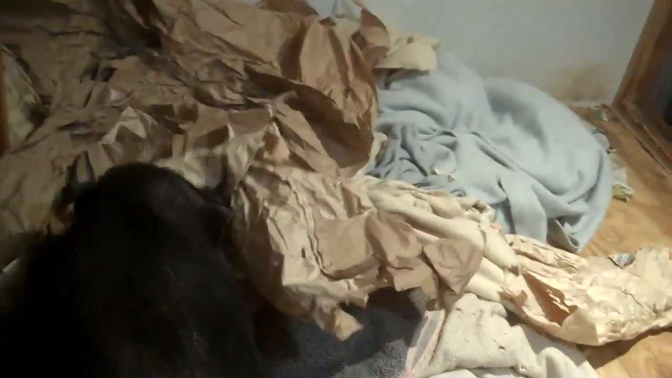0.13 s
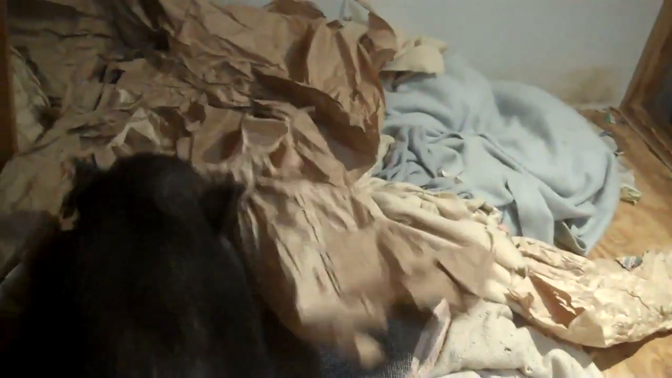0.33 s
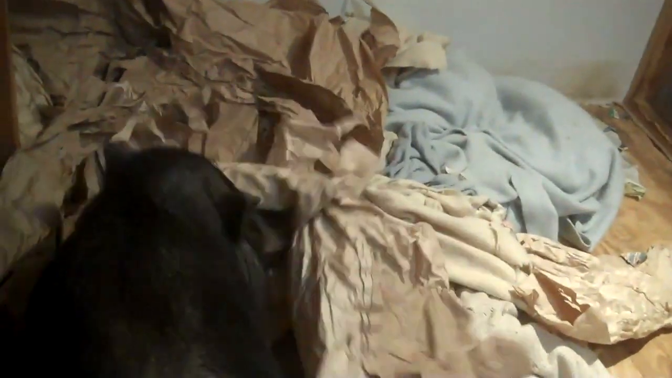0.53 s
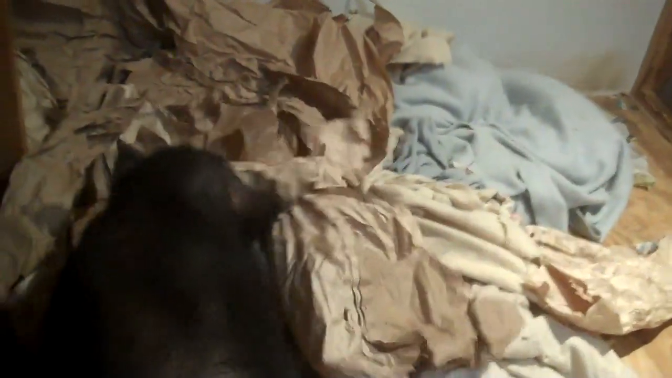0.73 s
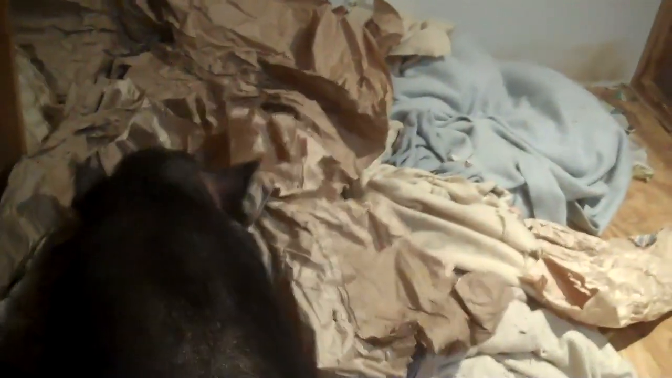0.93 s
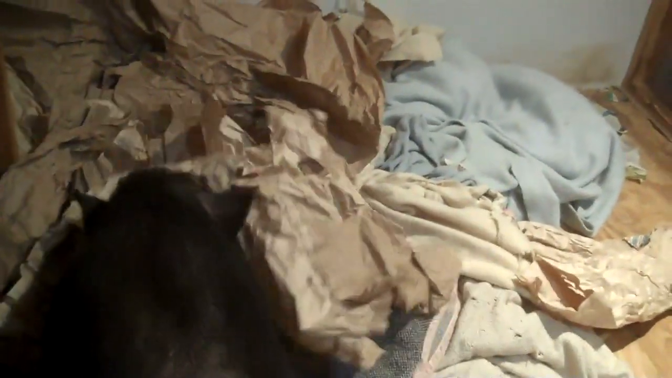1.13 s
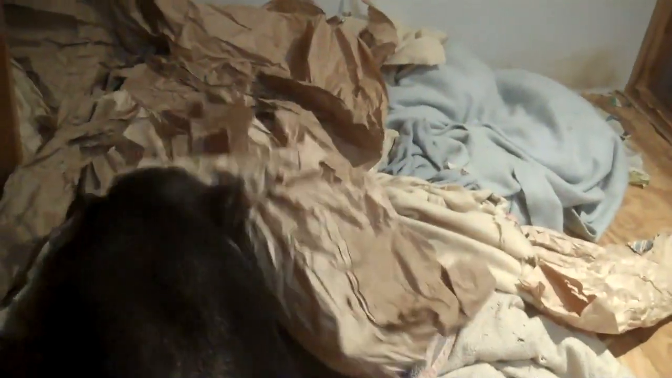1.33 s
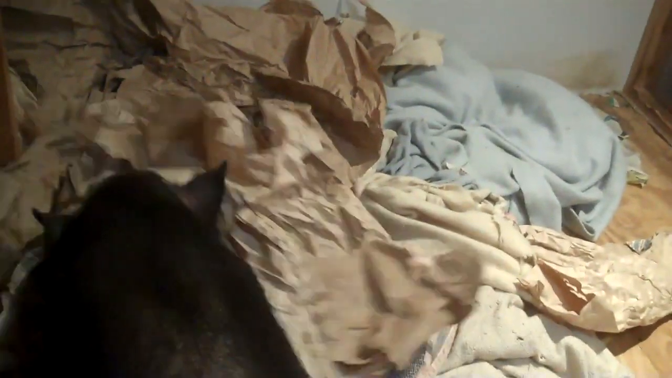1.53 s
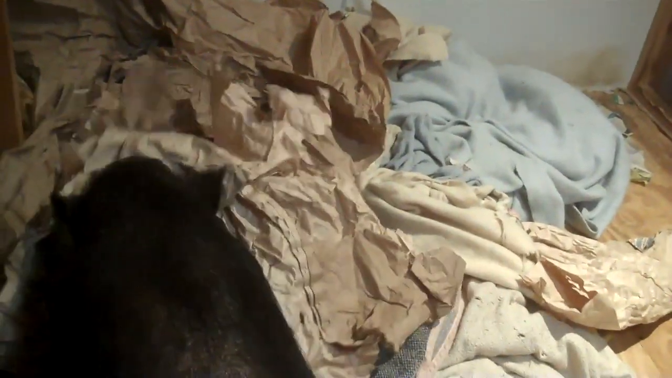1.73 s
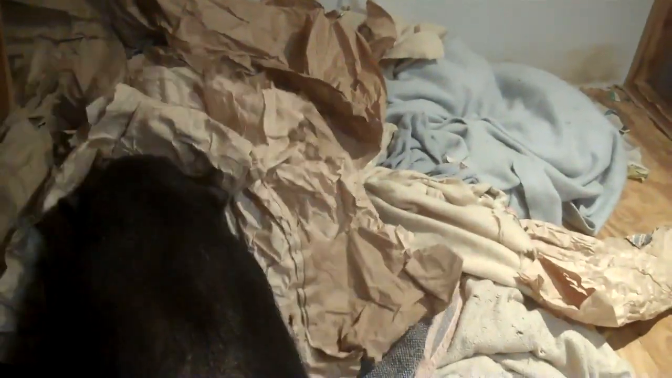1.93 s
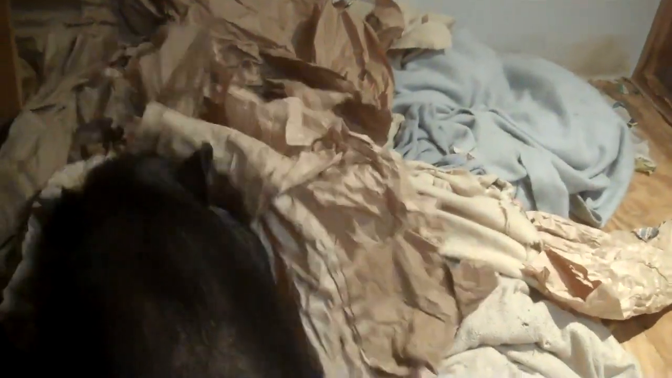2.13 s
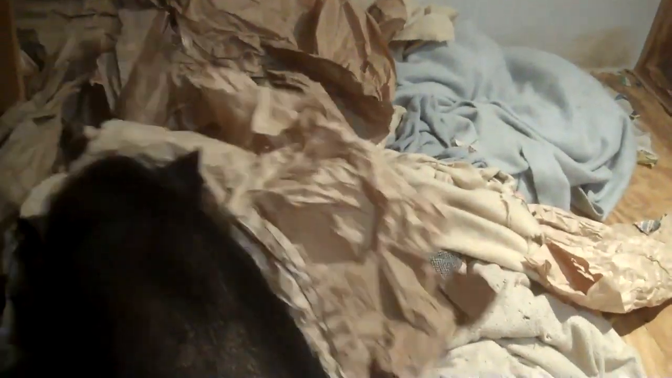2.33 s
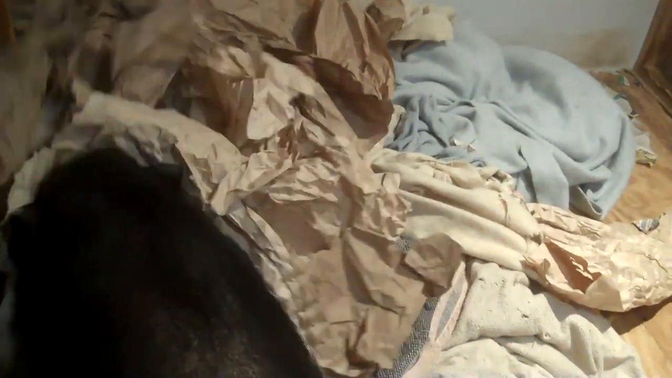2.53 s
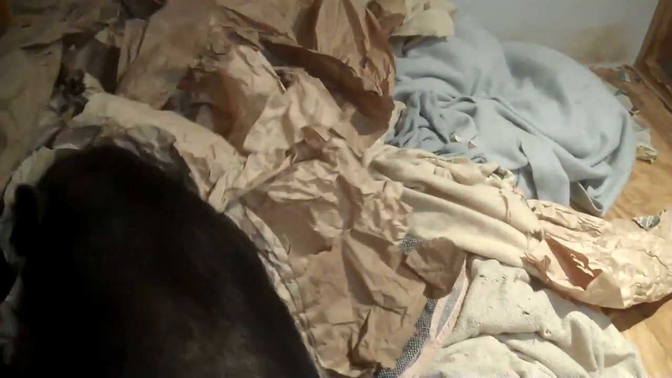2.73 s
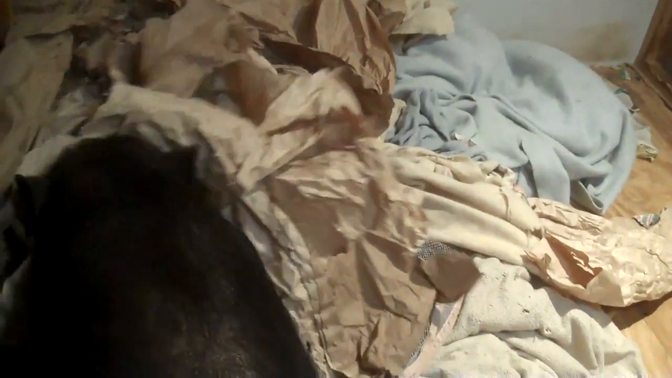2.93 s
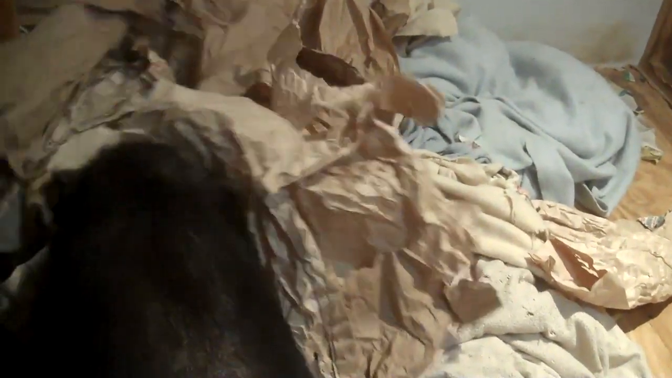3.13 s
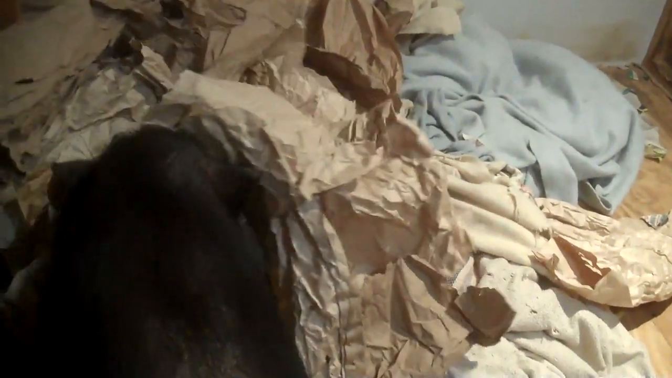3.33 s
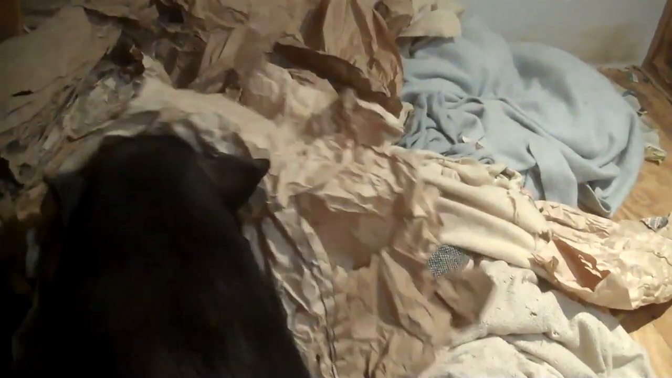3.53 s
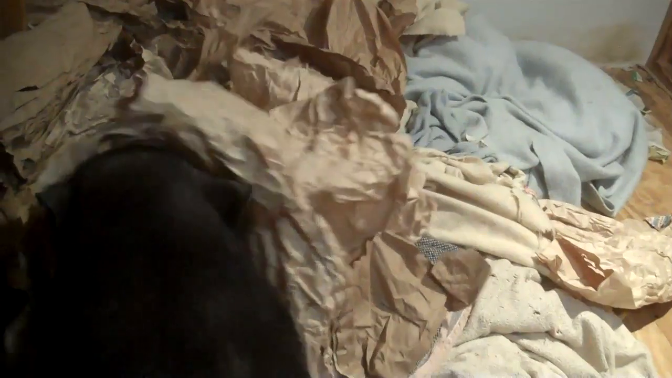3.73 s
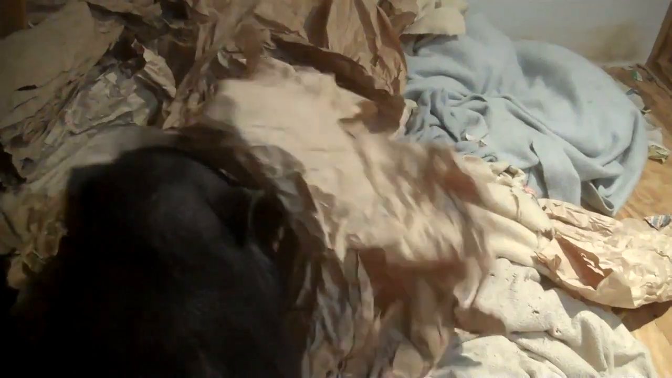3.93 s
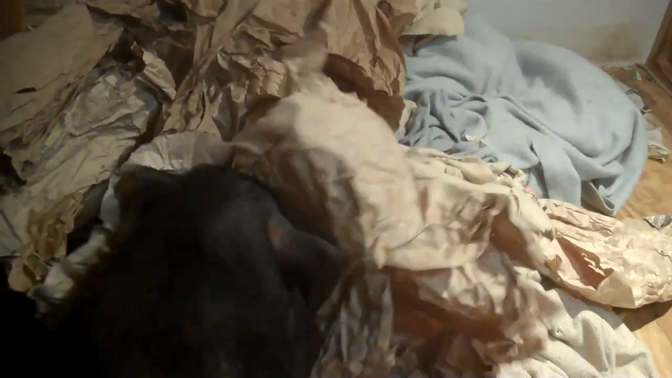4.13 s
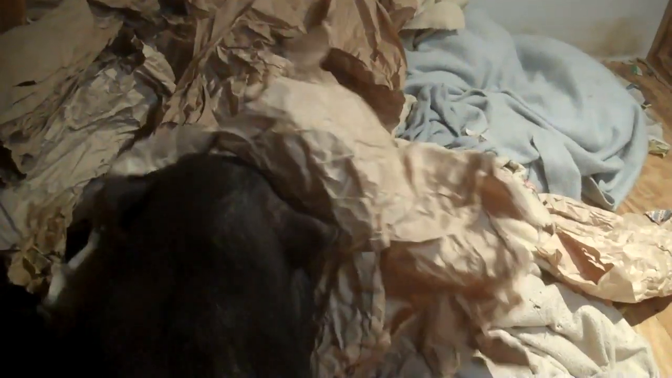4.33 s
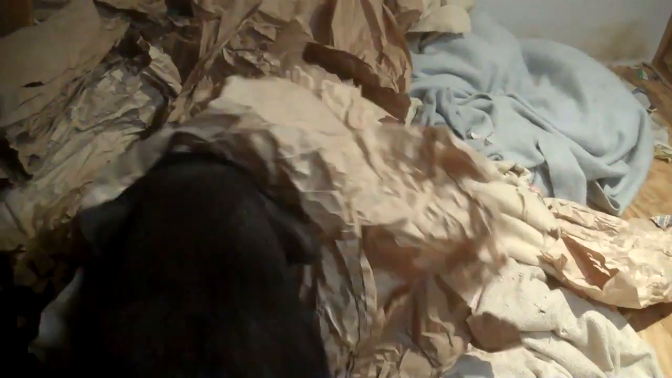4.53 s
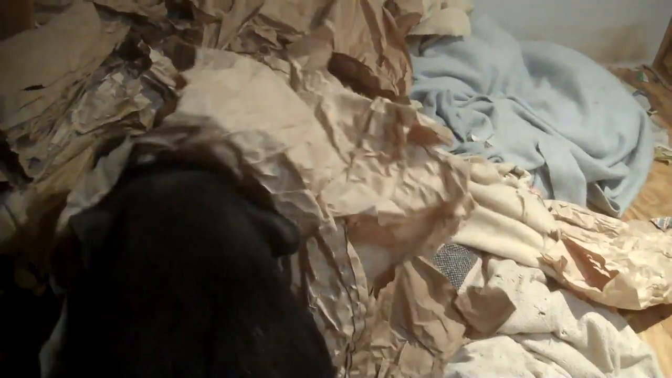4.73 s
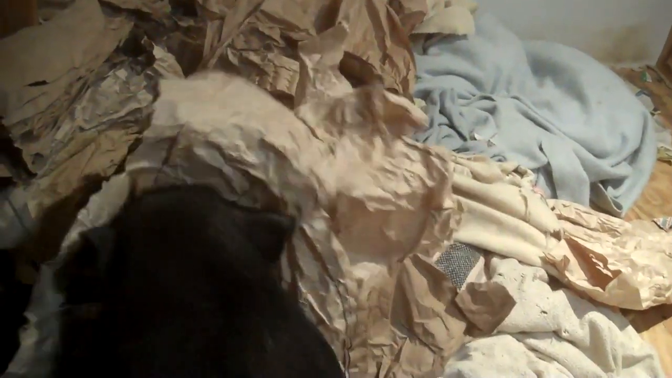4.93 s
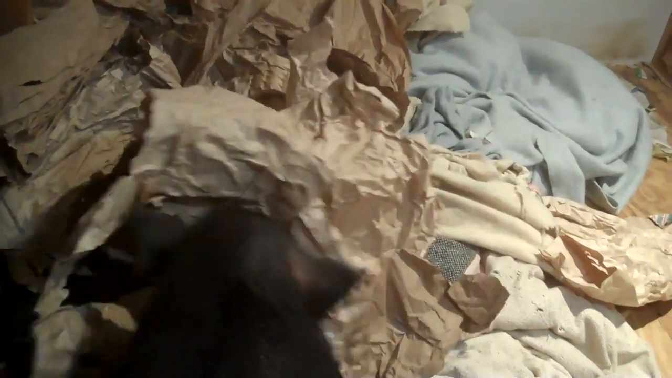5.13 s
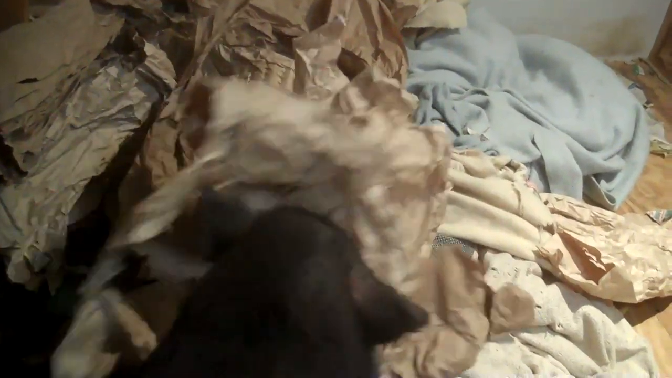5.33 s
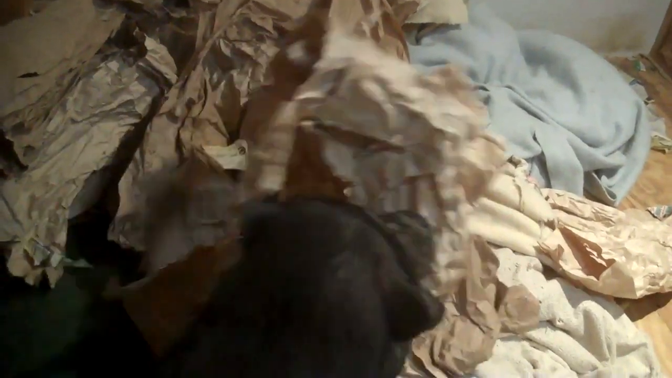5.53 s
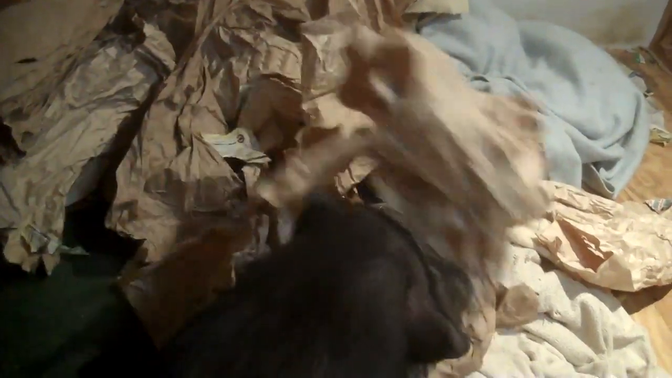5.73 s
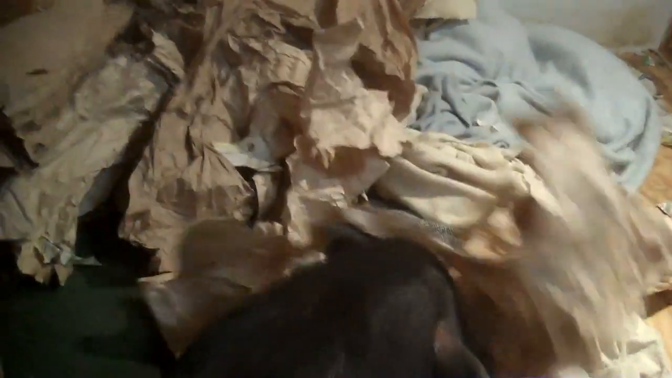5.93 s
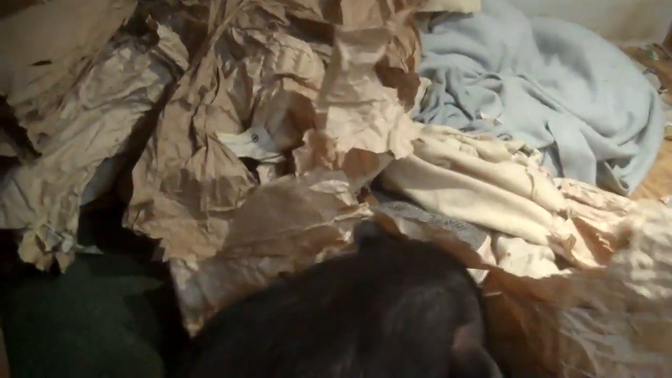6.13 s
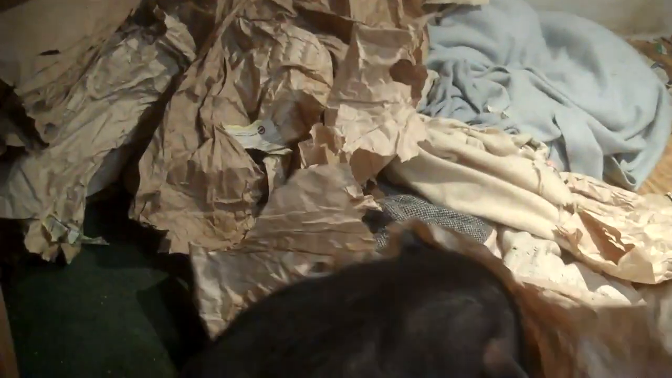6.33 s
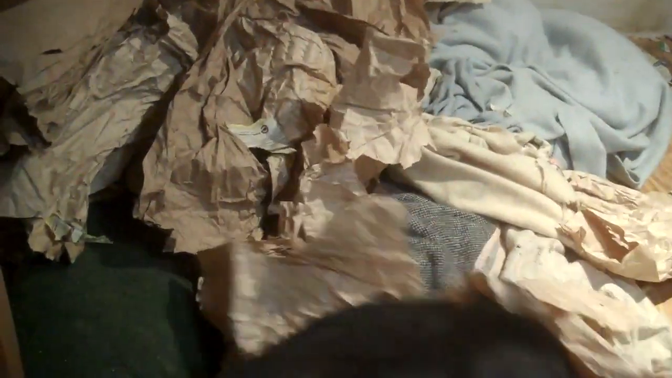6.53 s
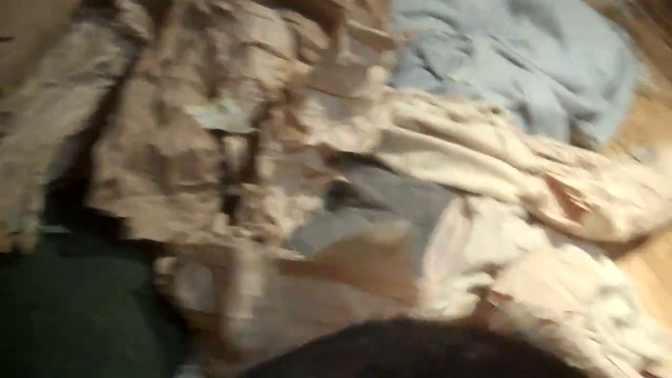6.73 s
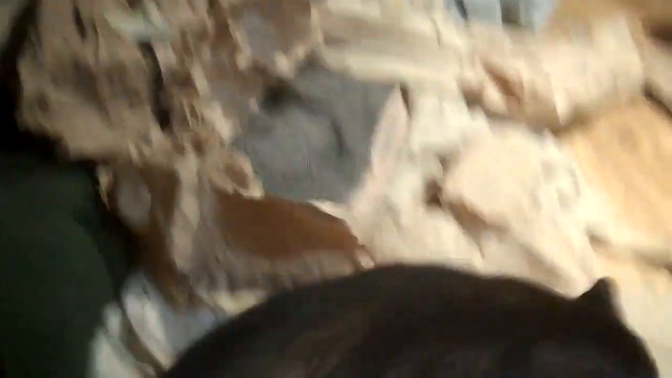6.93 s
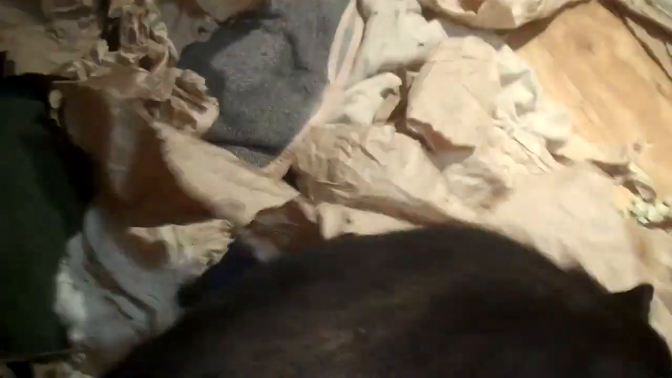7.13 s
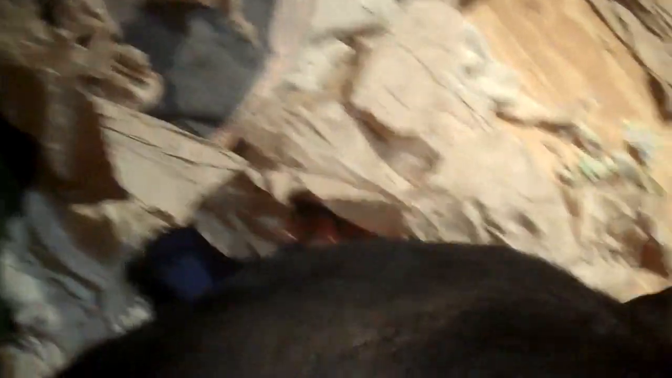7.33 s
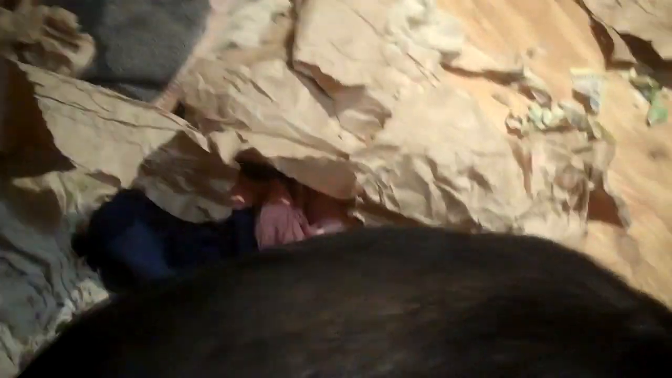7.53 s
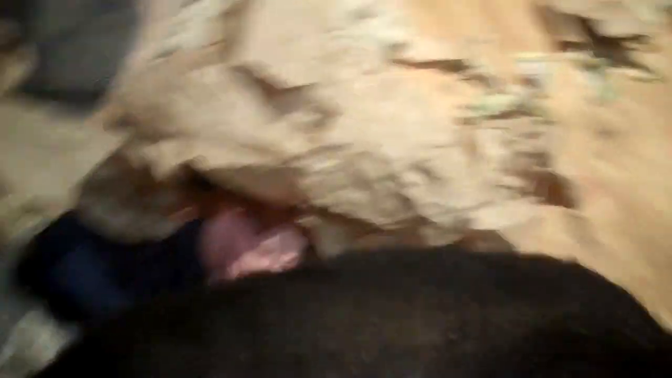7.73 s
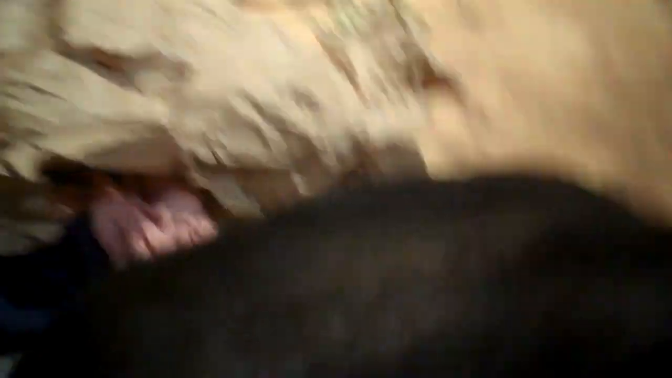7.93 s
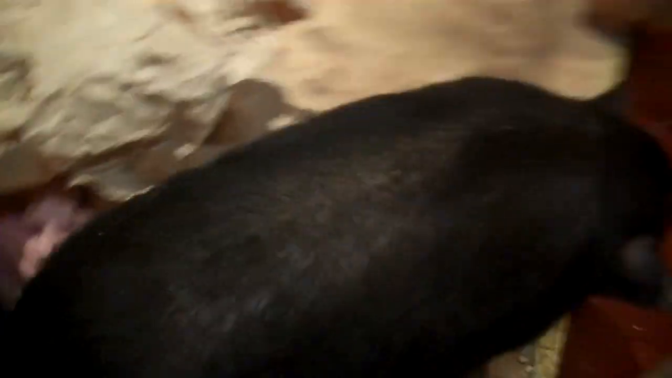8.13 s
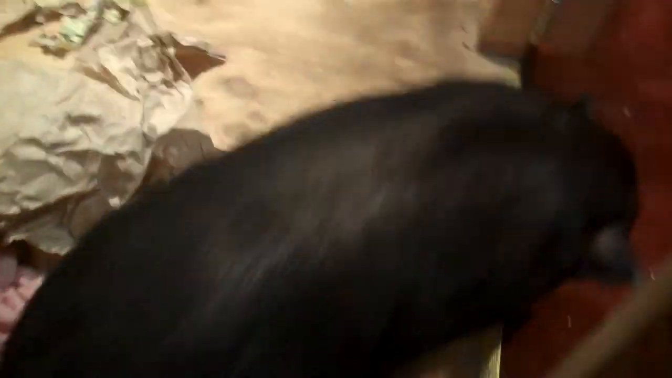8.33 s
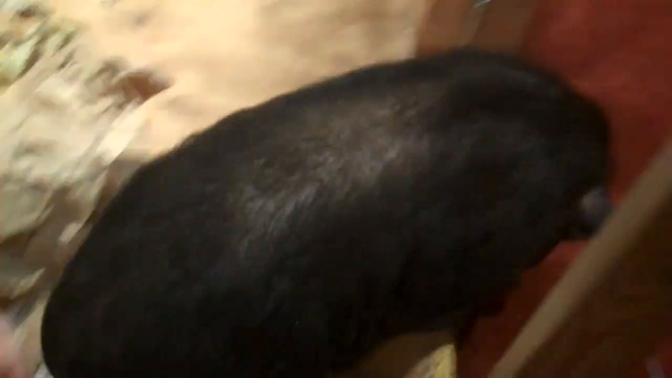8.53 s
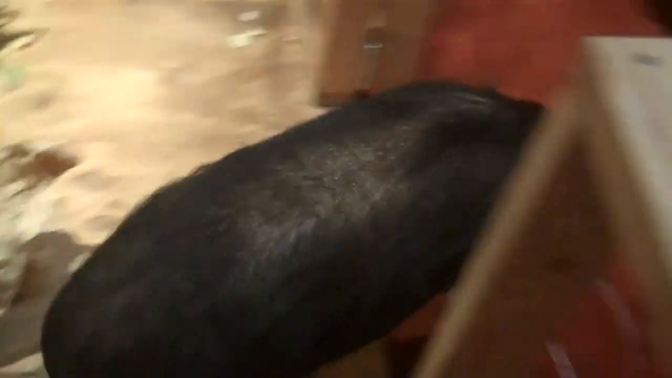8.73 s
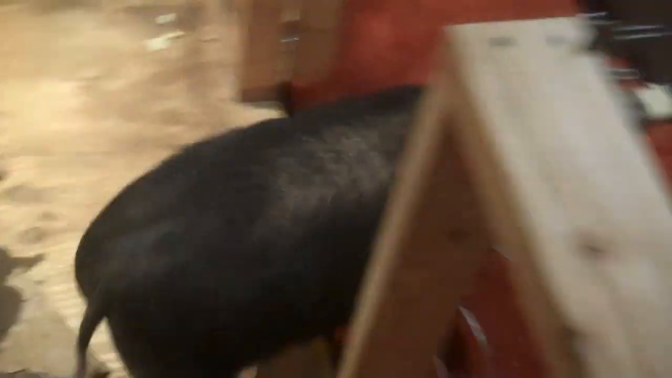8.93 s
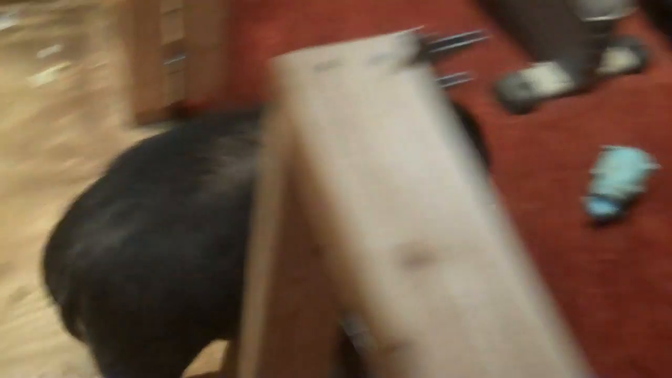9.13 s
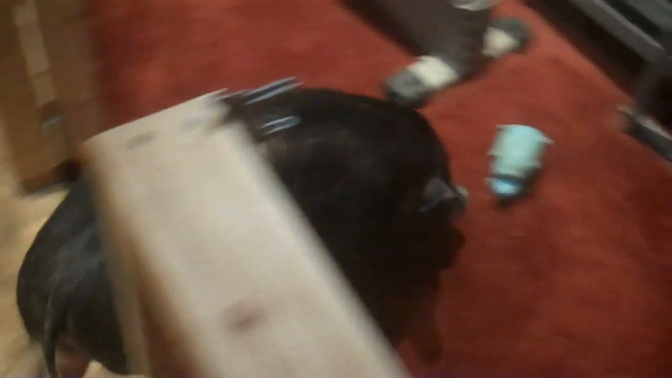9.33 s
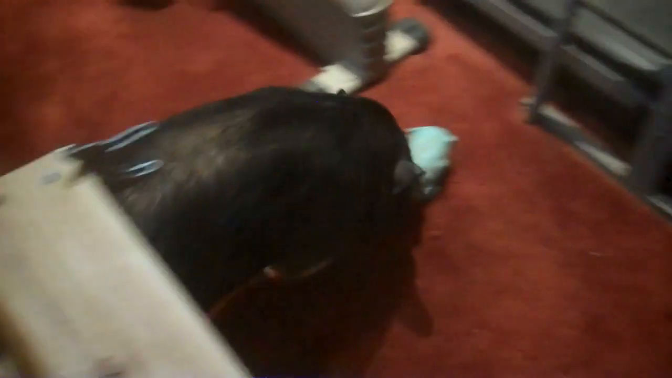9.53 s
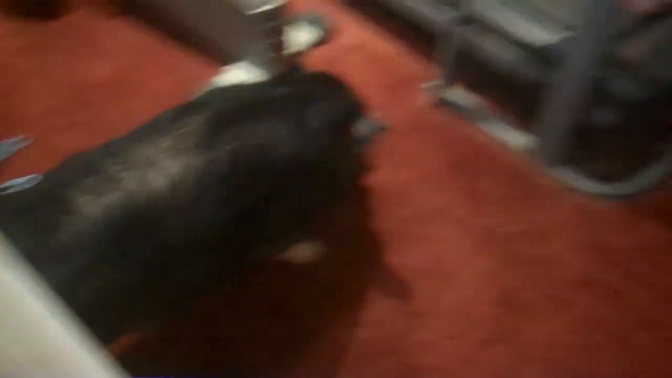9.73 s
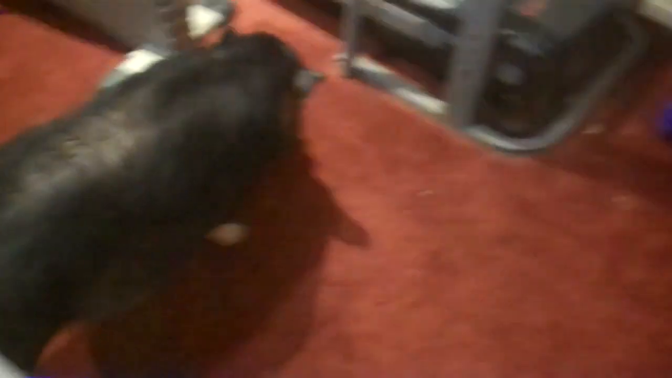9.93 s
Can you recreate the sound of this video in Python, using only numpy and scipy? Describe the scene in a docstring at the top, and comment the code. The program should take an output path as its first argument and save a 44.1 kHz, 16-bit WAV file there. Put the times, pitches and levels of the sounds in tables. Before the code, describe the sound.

A small pig shoves through crinkling paper indoors, then walks off with a few hoof knocks on wood as the rustling fades.

```python
"""Packing paper rustles and cracks as a small pig roots in it, in a small room.
Creases buckle in thousands of tiny snaps that swell with each shove; bulges pop through.
From about 6 s the pig walks off: hooves knock on floorboards, something clinks, soft treads on carpet.
Heard through two small microphone ports, each with its own treble resonance."""
import sys
import numpy as np
from scipy import signal
from scipy.fft import rfft, irfft
from scipy.io import wavfile
from scipy.ndimage import uniform_filter1d

SR = 44100
rng = np.random.default_rng(int(sys.argv[2]) if len(sys.argv) > 2 else 0)


def bounce(signal):
    """Save signal as a 16-bit WAV file at the path given by the first command-line argument."""
    frames = np.transpose(np.atleast_2d(signal))
    limited = np.clip(frames, -1, 1)
    pcm = np.round(limited * 32767).astype(np.int16)
    wavfile.write(sys.argv[1], SR, pcm)


N = 440118

# snout or body on paper: (start [s], swell [s], hold [s], level [dB], folds re fine creases [dB])
PAPER_SHOVES = [(-0.04, 0.14, 0.17, -23, -4), (0.332, 0.049, 0.15, -26.5, -5.5),
                (0.591, 0.035, 0.052, -22.5, -4), (0.757, 0.058, 0.14, -26, -4.5),
                (1.062, 0.017, 0.098, -28.5, -1.5), (1.095, 0.2, 0.042, -18.5, -3.5),
                (1.407, 0.021, 0.046, -28.5, -16), (1.506, 0.079, 0.16, -28, -2),
                (1.658, 0.13, 0.18, -23.5, -1.5), (2.065, 0.028, 0.17, -27.5, -5.5),
                (2.29, 0.075, 0.019, -21.5, -3.5), (2.402, 0.019, 0.15, -28, -1),
                (2.522, 0.082, 0.035, -21.5, -2.5), (2.63, 0.041, 0.05, -27, 0),
                (2.746, 0.049, 0.079, -34, -4.5), (2.948, 0.062, 0.12, -29, -2),
                (3.179, 0.024, 0.078, -31, -2), (3.302, 0.034, 0.063, -38, -0.5),
                (3.492, 0.025, 0.13, -33, -6.5), (3.702, 0.012, 0.021, -36, 1.5),
                (3.747, 0.04, 0.079, -32.5, -6.5), (3.945, 0.063, 0.16, -29.5, -9),
                (4.295, 0.027, 0.024, -33, -21), (4.442, 0.018, 0.014, -35.5, -4),
                (4.499, 0.058, 0.13, -30.5, -11.5), (4.69, 0.026, 0.088, -35.5, -16),
                (4.85, 0.027, 0.045, -34.5, -13), (4.935, 0.049, 0.054, -30, -10.5),
                (5.2, 0.063, 0.078, -37, -5.5), (5.449, 0.012, 0.1, -35.5, -3),
                (5.692, 0.024, 0.33, -36.5, -4), (5.865, 0.12, 0.1, -30.5, -6.5),
                (6.141, 0.13, 0.018, -26.5, -7.5), (6.368, 0.058, 0.22, -35, -8),
                (6.615, 0.017, 0.018, -31, -1), (6.66, 0.034, 0.21, -33, -4.5),
                (6.747, 0.078, 0.037, -29.5, -7.5), (6.991, 0.011, 0.13, -31, -9),
                (7.25, 0.03, 0.15, -38.5, -4), (7.555, 0.017, 0, -47, 3), (7.845, 0.012, 0, -45.5, -1),
                (7.985, 0.028, 0, -43, -5.5), (8.141, 0.046, 0.0021, -29, -6.5),
                (8.268, 0.051, 0.14, -43.5, -4), (8.476, 0.023, 0.022, -39, -6.5),
                (8.56, 0.052, 0, -30.5, -11), (8.913, 0.01, 0, -57.5, 8.5), (9.262, 0.024, 0, -40.5, -6.5),
                (9.42, 0.01, 0, -59, 6.5), (9.481, 0.023, 0, -45, -24), (9.72, 0.01, 0, -56, -14)]
# light stirring under the shoves: (time [s], level [dB], folds re fine creases [dB])
PAPER_STIR = [(0.0, -29.5, -2), (2.7, -32.5, -2), (3.4, -35, -5.5), (4.299, -39, -6), (5.2, -38.5, -5),
              (5.66, -40.5, -5.5), (6.35, -36.5, -5), (7.2, -41, -5), (7.7, -48, -4), (7.9, -48.5, -1.5),
              (8.7, -65, -9), (8.88, -58, 2), (9.35, -55, 4.5), (9.5, -58, -4), (9.8, -57, -3),
              (9.98, -69, -16)]
# paper spectrum: (frequency [Hz], gain [dB])
PAPER_SPECTRUM = [(30, -48), (85, -27), (125, -25.5), (200, -12.5), (290, -12), (385, -3.5), (520, -6),
                  (680, -5.5), (810, -1), (960, -1.5), (1150, -2), (1950, 2), (3400, -1), (14500, -3.5)]
# stiff creases giving way: (time [s], level [dB], pitch [Hz], buckle run [s])
CREASE_SNAPS = [(0.047, -4.5, 4500, 0.0055), (0.138, -2.5, 4080, 0.0022), (0.246, -5, 6300, 0.00046),
                (0.2727, -2.5, 6030, 0.0038), (0.308, -6, 7140, .003), (0.403, -5, 4500, 0.0014),
                (0.555, -11, 4000, .001), (0.649, -7, 6000, 0.0017), (0.6575, -8, 5400, .002),
                (0.69, -4, 6380, 0.0046), (1.29, -4, 6340, .001), (1.318, -6, 5290, .002),
                (1.392, -20, 5800, 0.0021), (1.4266, -6.5, 5940, 0.00094), (1.489, -7, 6090, 0.0033),
                (1.874, -3, 7600, 0.0007), (2.386, -8, 5430, .001), (2.404, -4, 5600, 0.00065),
                (2.495, -13, 5700, .0006), (2.633, -8, 7400, 0.0021), (2.985, -14, 5670, .0015),
                (3.763, -13, 4070, 0.0053), (3.831, -17, 3900, .001), (4.0957, -7.5, 6100, 0.0006),
                (4.1311, -5.5, 7440, 0.00066), (4.137, -10.5, 7200, .0004), (4.152, -9.5, 5750, 0.0014),
                (4.3665, -12, 6170, 0.0092), (4.478, -19, 6000, .001), (4.677, -17, 6300, 0.0017),
                (4.856, -19, 7600, 0.0038), (4.981, -17, 4500, .001), (5.12, -20, 4000, 0.0011),
                (5.3008, -15.5, 3750, .006), (5.373, -18, 4020, 0.0051), (5.894, -18, 4000, .001),
                (6.009, -15, 4500, .001), (6.044, -8, 6400, 0.007), (6.235, -4.5, 5800, 0.0012),
                (6.625, -8, 7500, .014), (6.855, -12, 6900, .004), (6.8992, -12.5, 3850, .001),
                (7.006, -8, 6470, 0.015), (7.353, -19, 7000, .001), (7.473, -20, 4500, 0.0022),
                (7.481, -20, 4300, .003), (7.575, -20.5, 2770, 0.0016), (7.627, -20, 6600, 0.0011),
                (7.6554, -19.5, 2420, 0.0014), (8.0163, -25.5, 5800, 0.003), (8.149, -23, 5770, 0.0016),
                (8.192, -17, 6030, 0.0034), (8.4948, -17.5, 7500, 0.0027), (8.588, -15.5, 5650, 0.0014),
                (8.609, -10, 6760, .001), (9.161, -25, 6000, .001)]
# bulges flipping: (time [s], level [dB], pitch [Hz], t60 [s])
BULGE_POPS = [(0.208, -8, 2400, 0.055), (0.228, -8, 2400, .02), (0.243, -4, 1700, .02),
              (0.399, -13, 880, .025), (0.614, -6.5, 1970, .02), (0.688, -13, 477, 0.037),
              (0.974, -9, 1520, 0.023), (1.072, -9.5, 760, 0.037), (1.234, -5.5, 930, 0.023),
              (1.604, -10, 2210, 0.016), (2.594, -11, 1251, .02), (3.49, -25, 419.5, .04),
              (3.546, -19, 800, 0.046), (3.718, -21.5, 595, 0.036), (3.73, -17, 2000, 0.029),
              (4.188, -15, 2480, 0.028), (4.265, -26.5, 400, .025), (4.461, -20, 2300, .025),
              (4.576, -16, 1810, 0.045), (4.643, -17, 2300, 0.056), (4.81, -18.5, 2130, 0.029),
              (4.98, -27, 400, .03), (5.376, -17, 1210, .035), (5.405, -17, 780, 0.045),
              (5.47, -20, 2180, .03), (5.545, -29, 380, .03), (5.605, -28, 380, .03),
              (5.703, -17.5, 1377, 0.045), (5.813, -14.5, 1490, 0.078), (6.181, -17, 2050, 0.027),
              (6.594, -16, 2606, 0.043), (6.635, -16.5, 1960, .02), (6.737, -13.5, 2460, 0.014),
              (6.911, -22, 850, .02), (6.978, -18, 1502, .02), (7.573, -22.5, 2660, 0.012),
              (7.654, -20, 2090, .012), (8.084, -30, 3160, .01), (8.493, -22, 2310, .025)]
# weight settling on floor and carpet: (time [s], level [dB], boom re push [dB])
SOFT_TREADS = [(0.655, -49, -12), (1.79, -40, -6), (1.9, -44, -10), (2.56, -48, -12), (2.84, -50, -14),
               (6.742, -51, 6), (7.45, -47, 9), (7.784, -49, -6), (8.586, -40, -18), (8.626, -44, -18),
               (8.77, -49, -7), (9.031, -48, -15), (9.089, -48, -14), (9.681, -55, -7), (9.80, -54, -10)]
# soft tread spectrum: (frequency [Hz], gain [dB])
TREAD_SPECTRUM = [(30, -22), (60, -6), (90, 0), (180, 5.5), (320, 7.5), (480, -11), (900, -28), (3000, -52)]
# hooves on boards: (time [s], mid-band level [dB], thud re mid [dB], click re mid [dB],
# lower resonance [Hz], upper resonance [Hz], contact t60 [s], roll-in [s])
HOOF_STEPS = [(6.286, -14.5, -14, -12, 750, 1500, 0.02, 0.00045),
              (6.734, -33, 3, -2, 600, 2580, .03, 0.0016),
              (7.271, -20.5, -14, -2.5, 600, 1200, 0.045, 0.002),
              (7.427, -3, -15, -20.5, 795, 1720, 0.016, 0.0015),
              (7.773, -14.5, -5, -7.5, 950, 2310, 0.022, 0.00013),
              (8.361, -10.5, -17.5, -8, 640, 1390, 0.1, 0.0053),
              (8.626, -20.5, -8, -6, 1100, 2700, 0.03, 0.0034),
              (8.65, -20.5, -10, -8, 1200, 2300, 0.04, 0.00051),
              (8.7494, -15.5, -16, -4, 1060, 2200, 0.028, 0.0024),
              (9.021, -17.5, -14.5, -5, 1300, 1850, 0.036, 0.0095),
              (9.137, -19.5, -30, -3.5, 1420, 3100, 0.04, 0.001),
              (9.181, -16, -19, -0.5, 1150, 1840, 0.016, 0.003),
              (9.193, -21, -10, -1, 1100, 1920, .03, .002)]
# hoof contact spectrum: (frequency [Hz], gain [dB])
HOOF_SPECTRUM = [(40, -46), (110, -9.5), (200, 3), (350, 6), (550, -1), (900, -1), (1900, 2), (3200, -4),
                 (4500, -11), (7000, -16), (14000, -31)]
# wooden floor modes: (frequency [Hz], level [dB], t60 [s])
BOARD_MODES = [(303, -8, 0.16), (366, -9, 0.16), (615, -9, 0.12), (800, -9.5, 0.19), (861, -11, 0.19),
               (1030, -5, 0.12), (1440, -5, 0.17), (1616, -9, 0.12), (1905, -5, 0.077)]
# modes of a small hard object: (frequency [Hz], level [dB], t60 [s])
CLINK_MODES = [(460, -45, .35), (1770, -38, .16), (3350, -47, .3), (3400, -44, .36), (3470, -41, .13),
               (4150, -41, .12)]
# room air spectrum: (frequency [Hz], gain [dB])
AIR_SPECTRUM = [(30, -19), (70, -4), (150, 3.5), (400, 9.5), (1000, 4.5), (3000, -3.5), (5800, -1.5),
                (9500, -12), (14000, -18)]
# difference between the ports: (frequency [Hz], side re mid [dB])
SIDE_SPECTRUM = [(40, 1), (130, -9), (300, -19.5), (600, -14.5), (1100, -12.5), (2000, -9), (4000, -5.5),
                 (6200, -1), (8000, -4), (14000, 2)]
# port responses: (frequency [Hz], gain [dB])
LEFT_RESPONSE = [(2000, -2.5), (4500, 2), (6000, 3), (6600, 6), (7200, 11), (7900, 7), (8700, -1),
                 (10000, -7.5), (12000, -12.5), (14000, -15.5)]
RIGHT_RESPONSE = [(2000, -2), (3500, 3), (4800, 4.5), (5750, 10.5), (6200, 9), (6800, 2), (8000, -4),
                  (9500, -11.5), (11500, -24), (14000, -33)]


def from_db(db):
    return np.exp(np.asarray(db) * np.log(10) / 20)


def unit_rms(x):
    return x / np.sqrt(np.mean(x ** 2) + 1e-20)


def unit_blow(x):
    """Scales a blow to the energy of unit level held for 0.5 ms."""
    return x / np.sqrt(np.sum(x[0] ** 2) / (.0005 * SR))


def seconds(length_s):
    return np.arange(int(length_s * SR)) / SR


def decay(t, t60_s, hold_s=0):
    return from_db(-60 * np.maximum(t - hold_s, 0) / t60_s)


def add(track, time_s, sound):
    start = max(round(time_s * SR), 0)
    track[:, start:start + sound.shape[1]] += sound[:, :N - start]


def butter(x, order, hz, kind):
    return signal.sosfilt(signal.butter(order, hz, kind, fs=SR, output="sos"), x + 1e-18)


def colour(x, spectrum, size=4096):
    """Minimum-phase filter following (frequency [Hz], gain [dB]) points."""
    hz, db = np.transpose(spectrum)
    grid_hz = np.maximum(np.arange(size // 2 + 1) * SR / size, 1)
    gain = from_db(np.interp(np.log(grid_hz), np.log(hz), db))
    cepstrum = irfft(np.log(gain))
    cepstrum[1:size // 2] *= 2
    cepstrum[size // 2 + 1:] = 0
    impulse = np.float32(irfft(np.exp(rfft(cepstrum)))[None, :size // 2])
    return signal.oaconvolve(np.float32(np.atleast_2d(x)), impulse, axes=1)[:, :x.shape[-1]]


def whiten(x, size=4096):
    """Flattens the chance colour of a short burst."""
    hz = np.arange(1, size // 2 + 1) * SR / size
    powers = uniform_filter1d(np.abs(rfft(x, size)[:, 1:]) ** 2, size=21)
    inverse_db = -10 * np.log10(powers + 1e-12)
    return np.vstack([colour(row, np.transpose([hz, db])) for row, db in zip(x, inverse_db)])


def registers(x, low_hz=500, high_hz=3000):
    """Crossover: bass, middle, treble."""
    bands = [(low_hz, "low"), ([low_hz, high_hz], "band"), (high_hz, "high")]
    return [butter(butter(x, 2, hz, kind), 2, hz, kind) for hz, kind in bands]


def drift(corner_hz, hop=64):
    """Slow noise, unit RMS."""
    pole = np.exp(-2 * np.pi * corner_hz * hop / SR)
    noise = rng.standard_normal(2 * N // hop)
    slow = signal.lfilter([1], [1, -2 * pole, pole * pole], noise)[-(N // hop):]
    return np.interp(np.arange(N) / hop, np.arange(len(slow)), unit_rms(slow))


def paper_drive_db(settle_t60_s=0.33, drift_hz=14, catch_db=0.73, flutter_db=3):
    """Drive on sheets, folds and fine creases: shoves swell, hold and settle over the stirring."""
    t = np.arange(0, N / SR, .002)
    stir_s, *stir = np.transpose(PAPER_STIR)
    stir_db, stir_weight_db = [np.interp(t, stir_s, column) for column in stir]
    crease_power = from_db(stir_db) ** 2
    fold_power = from_db(stir_db + stir_weight_db) ** 2
    for start_s, swell_s, hold_s, level_db, weight_db in PAPER_SHOVES:
        push = np.clip((t - start_s) / swell_s, 0, 1) * decay(t - start_s, settle_t60_s, swell_s + hold_s)
        crease_power += (push * from_db(level_db)) ** 2
        fold_power += (push * from_db(level_db + weight_db)) ** 2
    slip_db = catch_db * drift(drift_hz)   # paper catches and slips
    folds_db, creases_db = [np.interp(np.arange(N) / SR, t, 10 * np.log10(power)) + slip_db
                            for power in (fold_power, crease_power)]
    flap_db = -10.5 + 0.51 * (folds_db - creases_db)   # sheets flap more in a weighty shove
    sheets_db = folds_db + flap_db + flutter_db * drift(drift_hz)
    return sheets_db, folds_db, creases_db


def crease(hz, t60_s, ring_db, length_s, run_s=0):
    """One buckle as (mid, side): a ragged crack while the adjacent facet rings."""
    t = seconds(length_s)
    crack = rng.standard_normal((2, len(t)))
    facet = np.sin(2 * np.pi * (hz * t + rng.random((2, 1))))
    return (crack + from_db(ring_db) * facet) * decay(t, t60_s, run_s)


def rustle(max_rate_per_s=2200, spread_db=0.2, slide_db=-2, trim_db=-0.63, facet_count=400):
    """Tiny creases buckle at random; harder shoves bring more of them and more sliding hiss."""
    drives_db = paper_drive_db()
    effort = from_db(.3 * (drives_db[2] - drives_db[2].max()))
    onsets = np.flatnonzero(rng.random(N) < max_rate_per_s * effort / SR)
    sizes = from_db(-spread_db * rng.exponential(1, N)[onsets])
    # large facets ring lower and longer
    facets = np.array([crease(hz, t60_s=0.01 * (3000 / hz) ** .5, ring_db=-5, length_s=.005)
                       for hz in np.geomspace(800, 8000, facet_count)])
    picks = rng.integers(0, facet_count, N)[onsets]
    grains = facets[picks] * sizes[:, None, None]
    samples = (onsets[:, None] + np.arange(facets.shape[2])).ravel()
    crackle = np.array([np.bincount(samples, grains[:, channel].ravel(), N)[:N] for channel in range(2)])
    sliding = from_db(slide_db) * effort * rng.standard_normal((2, N))
    out = np.zeros((2, N))
    # each register is levelled to its drive
    for band, drive_db in zip(registers(colour(crackle + sliding, PAPER_SPECTRUM)), drives_db):
        power = uniform_filter1d(uniform_filter1d(band[0] ** 2, size=1800), size=1200)
        out += band * from_db(drive_db + trim_db) / np.sqrt(np.abs(power) + 1e-12)
    return out


def crinkles(max_rate_per_s=40, low_hz=1100, high_hz=8000, t60_cycles=34, boost_db=3, spread_db=2):
    """Mid-size creases stand out singly, each at its own pitch; lower ones ring longer."""
    _, folds_db, creases_db = paper_drive_db()
    effort = from_db(.3 * (creases_db - creases_db.max()))
    out = np.zeros((2, N))
    for onset in np.flatnonzero(rng.random(N) < max_rate_per_s * effort / SR):
        fineness = rng.random()
        hz = low_hz * (high_hz / low_hz) ** fineness
        drive_db = fineness * creases_db[onset] + (1 - fineness) * folds_db[onset]
        level_db = drive_db + boost_db + spread_db * rng.uniform(-1.1, 1)
        crinkle = crease(hz, t60_cycles / hz, ring_db=4, length_s=.03)
        add(out, onset / SR, unit_blow(crinkle) * from_db(level_db))
    return colour(out, PAPER_SPECTRUM)


def snaps(trim_db=-2.2, low_cut_hz=350):
    """Stiff creases let go: the buckle runs at full strength, then dies. Too small to radiate bass."""
    out = np.zeros((2, N))
    for time_s, level_db, hz, run_s in CREASE_SNAPS:
        snap = crease(hz, t60_s=0.0085, ring_db=-6, length_s=.025, run_s=run_s)
        add(out, time_s, unit_blow(snap) * from_db(level_db + trim_db))
    return butter(colour(out, PAPER_SPECTRUM), 2, low_cut_hz, "high")


def pops(edge_ratio=1.43, run_s=0.0047, trim_db=-2.5):
    """A bulge flips with a dry, hollow crackle around its own pitch."""
    out, t = np.zeros((2, N)), seconds(.1)
    for time_s, level_db, hz, t60_s in BULGE_POPS:
        crackle = rng.standard_normal((2, len(t))) * decay(t, t60_s, run_s)
        hollow = butter(crackle, 2, [hz / edge_ratio, hz * edge_ratio], "band")
        add(out, time_s, unit_blow(hollow) * from_db(level_db + trim_db))
    return out


def treads(push_swell_s=0.014, boom_hz=176, boom_swell_s=0.024):
    """Weight settles with a dull push; the whole floor booms briefly under the load."""
    out, t = np.zeros((2, N)), seconds(.25)
    push_envelope, boom_envelope = [t / s * np.exp(1 - t / s) for s in (push_swell_s, boom_swell_s)]
    boom = np.sin(2 * np.pi * boom_hz * t) * boom_envelope * [[1], [0]]   # mid only
    for time_s, level_db, boom_db in SOFT_TREADS:
        push = unit_rms(colour(rng.standard_normal((2, len(t))), TREAD_SPECTRUM)) * push_envelope
        add(out, time_s, from_db(level_db) * (push + from_db(boom_db) * boom))
    return out


def hooves(strike_db=7, spot_db=-5, edge_ratio=1.13, boards_db=-21):
    """Hooves land squarely or roll in with a rough contact; each spot on the boards rings differently."""
    out, t = np.zeros((2, N)), seconds(.3)
    mode_hz, mode_db, mode_t60_s = np.transpose(BOARD_MODES)[:, :, None]
    for time_s, level_db, thud_db, click_db, lower_hz, upper_hz, contact_t60_s, roll_s in HOOF_STEPS:
        touch = rng.standard_normal((2, len(t))) * decay(t, contact_t60_s, roll_s)
        touch[0, int(roll_s * SR)] += from_db(strike_db)   # hard edge lands as the roll ends
        loading = np.minimum((t + 1 / SR) / roll_s, 1)
        contact = colour(whiten(touch * loading), HOOF_SPECTRUM)
        spot = sum(unit_blow(butter(contact, 1, [hz / edge_ratio, hz * edge_ratio], "band"))
                   for hz in (lower_hz, upper_hz))
        knock = unit_blow(unit_blow(contact) + from_db(spot_db) * spot)
        gains = from_db(boards_db + mode_db + rng.normal(0, 0.9, mode_hz.shape))
        detuned_hz = mode_hz * rng.uniform(.98, 1.02, mode_hz.shape)
        modes = np.sin(2 * np.pi * (detuned_hz * t + rng.random((2,) + mode_hz.shape)))
        boards = np.sum(gains * modes * decay(t, mode_t60_s), axis=1)
        for band, band_db in zip(registers(knock + boards * loading), (thud_db, 0, click_db)):
            add(out, time_s, unit_blow(band) * from_db(level_db + band_db))
    return out


def clink(time_s=9.029):
    """A small hard object rings once, just after a step."""
    out, t = np.zeros((2, N)), seconds(.3)
    for hz, level_db, t60_s in CLINK_MODES:
        add(out, time_s, from_db(level_db) * np.sin(2 * np.pi * hz * t[None]) * decay(t, t60_s))
    return out


def room(x, t60_s=0.26, bass_t60_s=0.36, size=16384, tail_count=24):
    """Short dense wall echoes; the source moves, so successive frames get different tails."""
    hop = size // 8
    t = np.arange(size - 2 * hop) / SR
    bass, middle, treble = registers(rng.standard_normal((tail_count, 2, len(t))))
    build_up = 1 - decay(t, 0.0015)
    tails = (bass * decay(t, bass_t60_s) + (middle + treble) * decay(t, t60_s)) * build_up
    tails /= np.sqrt(np.sum(tails ** 2, axis=2, keepdims=True))
    responses = rfft(np.float32(tails), size)
    window = np.sin(np.pi * np.arange(2 * hop) / (2 * hop))
    out = np.zeros((2, N))
    for k, start in enumerate(range(0, N - hop, hop)):
        frame = x[:, start:start + 2 * hop]
        spectrum = rfft(np.float32(frame * window[:frame.shape[1]]), size)
        add(out, start / SR, irfft(spectrum * responses[k % tail_count]))
    return out


def left_right(x):
    """Mid and side to two closely spaced ports."""
    return x[0] + colour(x[1], SIDE_SPECTRUM) * [[1], [-1]]


def scene(paper_wet_db=-7, step_wet_db=-3, step_low_cut_hz=120, air_db=-53.5):
    """Paper and steps in the room, through the ports, over quiet room air."""
    paper = rustle() + crinkles() + pops() + snaps()
    steps = butter(hooves() + clink(), 2, step_low_cut_hz, "high")   # keeps both free of deep thump
    send = from_db(paper_wet_db) * paper + from_db(step_wet_db) * steps
    left, right = left_right(paper + steps + treads() + room(send))
    air = unit_rms(left_right(colour(rng.standard_normal((2, N)), AIR_SPECTRUM)))
    return np.vstack([colour(left, LEFT_RESPONSE), colour(right, RIGHT_RESPONSE)]) + from_db(air_db) * air


def record(dry, knee=.72, cutoff_hz=14200):
    """Soft clip, then steep low-pass."""
    rounded = dry / (1 + (dry / knee) ** 4) ** .25
    return signal.sosfilt(signal.ellip(10, .1, 80, cutoff_hz, fs=SR, output="sos"), rounded)


dry = scene()
out = record(dry)
bounce(out)
```